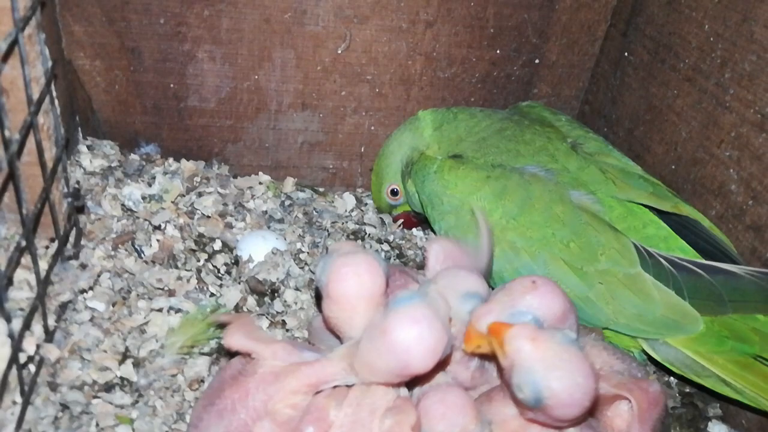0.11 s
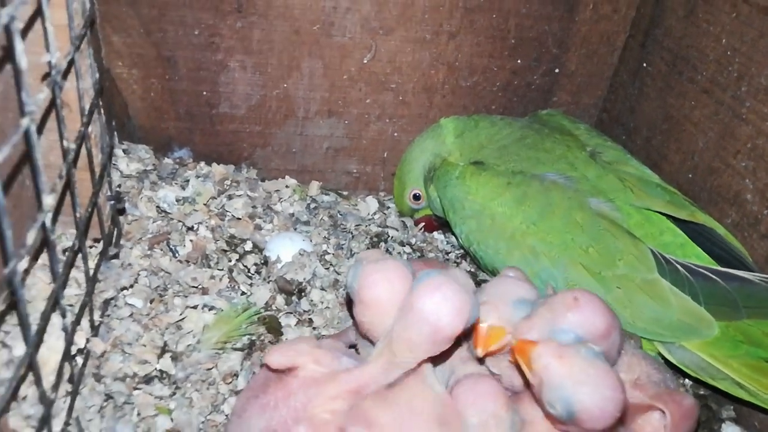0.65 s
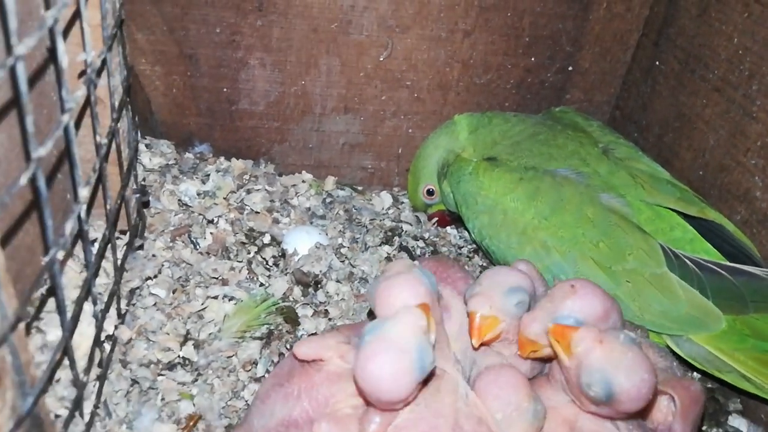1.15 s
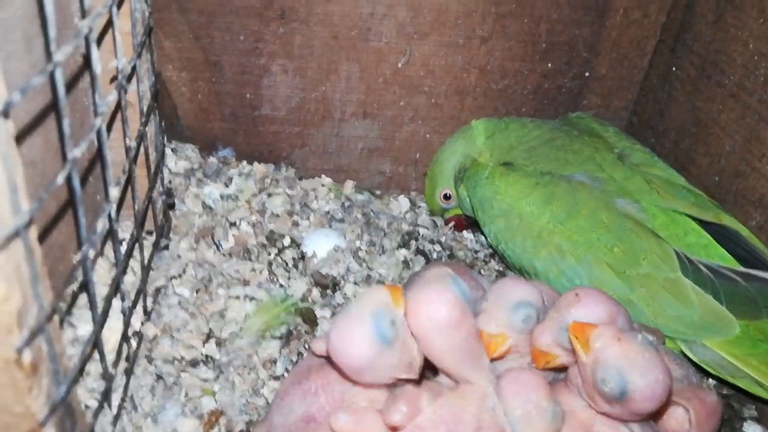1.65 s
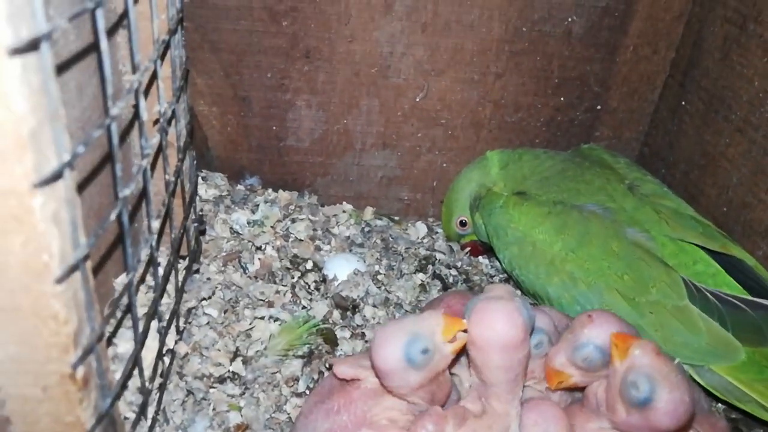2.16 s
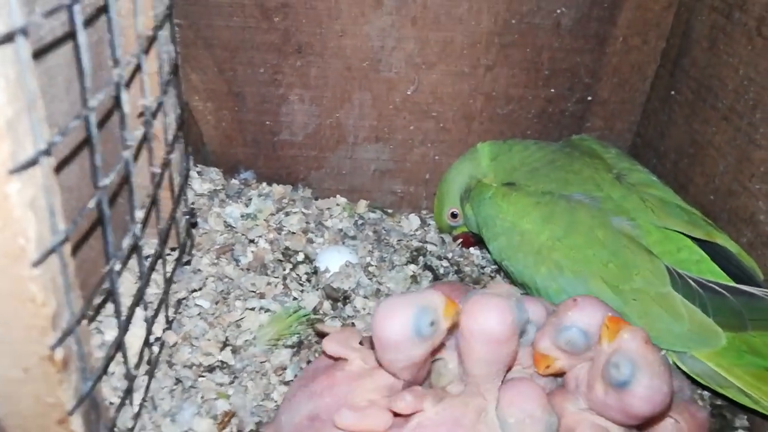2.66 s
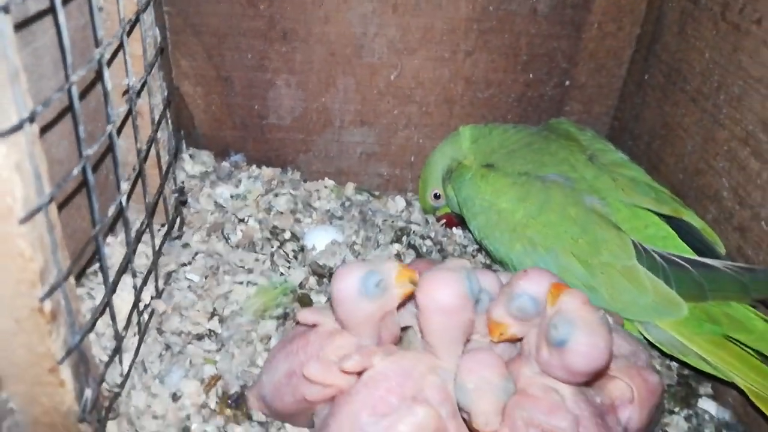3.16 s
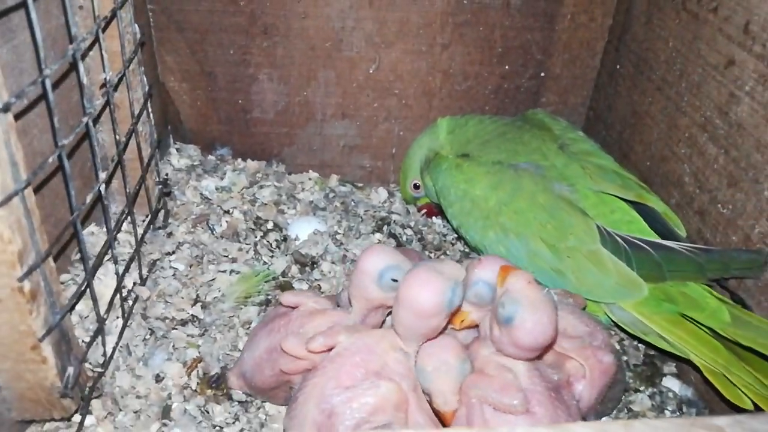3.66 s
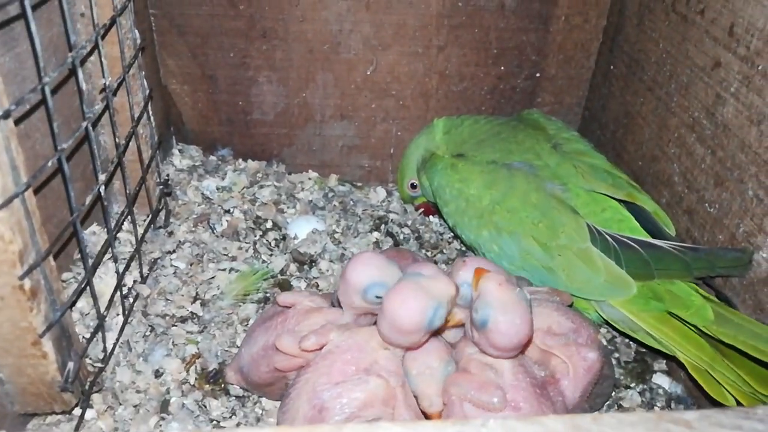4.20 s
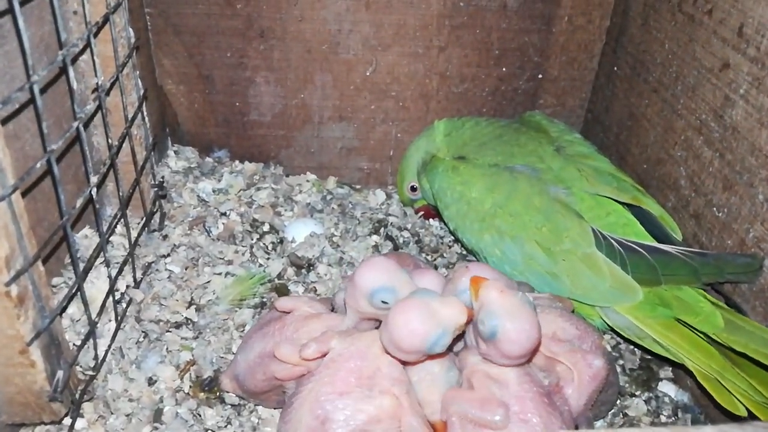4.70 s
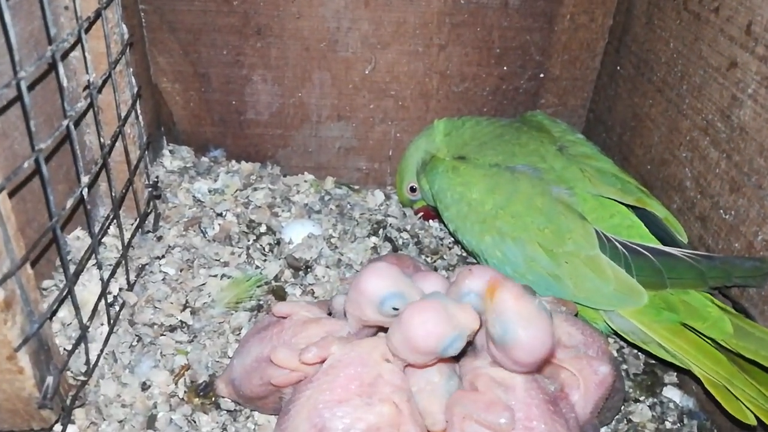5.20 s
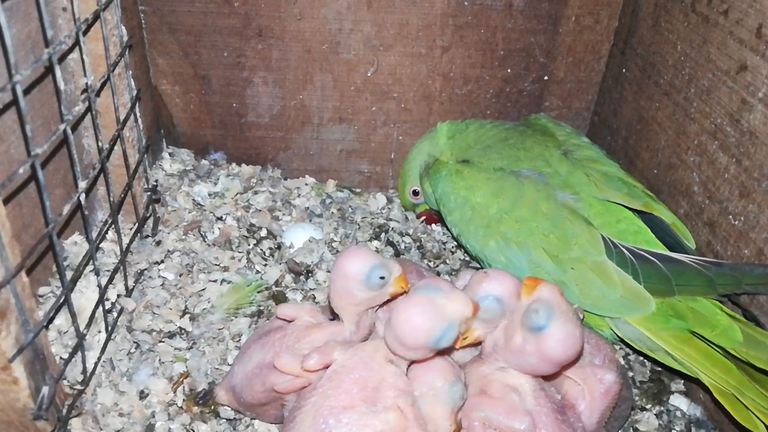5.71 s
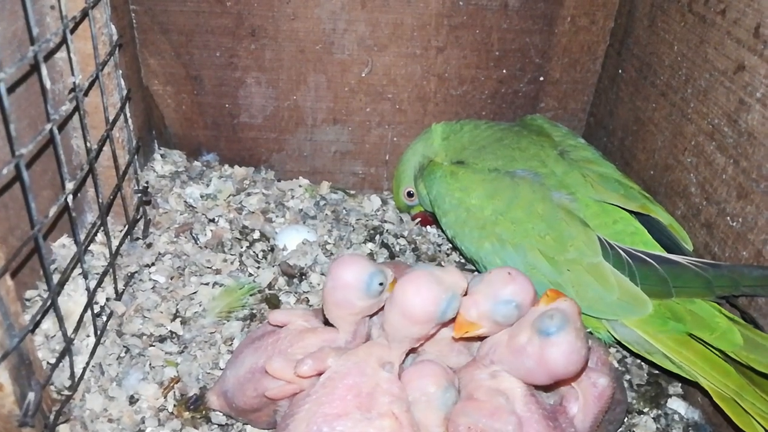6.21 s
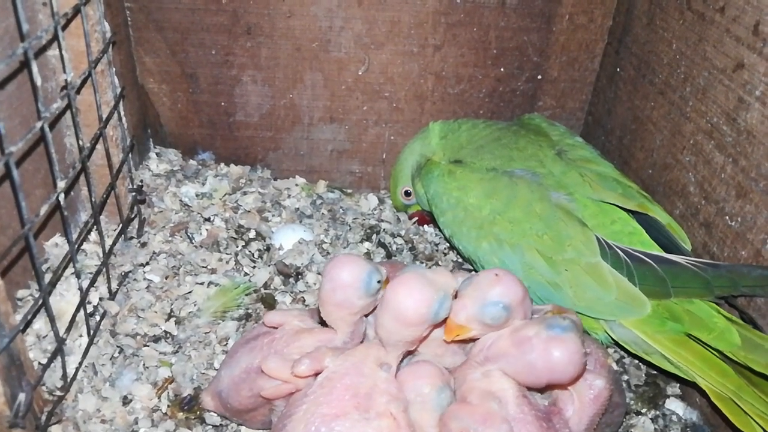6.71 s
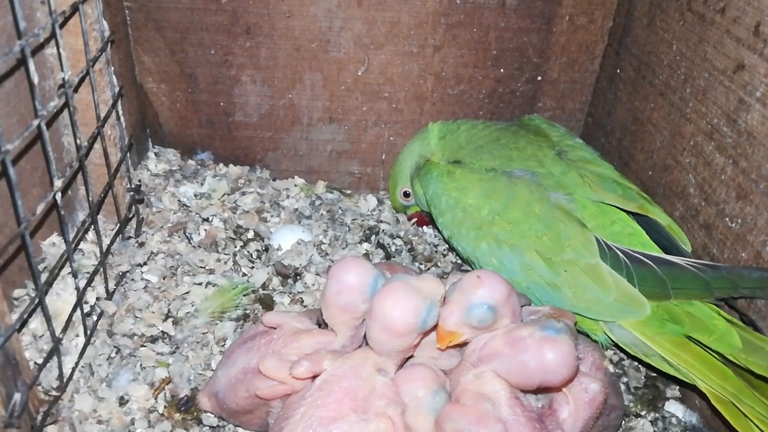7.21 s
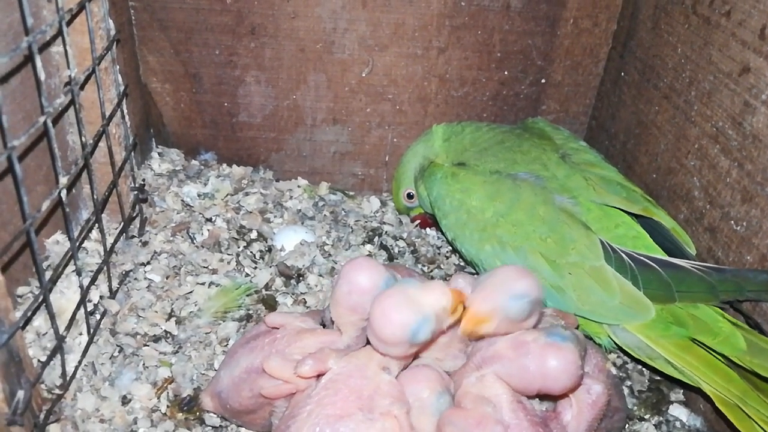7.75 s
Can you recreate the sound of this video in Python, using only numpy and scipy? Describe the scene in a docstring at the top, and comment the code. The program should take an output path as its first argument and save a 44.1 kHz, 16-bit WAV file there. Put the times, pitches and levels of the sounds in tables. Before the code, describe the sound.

Hungry parakeet nestlings trade rising whistles, raspy falling squawks and quick hoarse cries inside a hard, echoing wooden nest box.

```python
"""Begging nestling parakeets

Nestlings call in turns: one gives a rising whistle that breaks into a long falling squawk, another a quick
falling cry, at times after a short squeak or with a rasp; one clear arching call is close by. The voices are
stacks of harmonics on gliding pitches, in a hard-walled room of echoes and fading noise. Faint hoots (wavering
tones), a hum and a handling rumble (filtered noise) show in pauses, when the recorder's gain control lets go."""
import sys
import numpy as np
from scipy import signal
from scipy.fft import rfft, irfft, next_fast_len
from scipy.io import wavfile
from scipy.ndimage import uniform_filter1d

SR = 44100
rng = np.random.default_rng(int(sys.argv[2]) if len(sys.argv) > 2 else 0)


def invert_db(x):
    """Field ratio 10**(x/20) for x, a level in decibels (scalar or array-like)."""
    u = np.asarray(x, float) / 20
    return 10 ** u


def output_pcm(signal):
    """Save a mono or channel-first signal as 16-bit PCM at the path in sys.argv[1].

    Samples are clipped to [-1, 1] before scaling.
    """
    pcm = np.clip(np.atleast_2d(signal).T, -1, 1) * 32767
    wavfile.write(sys.argv[1], SR, np.round(pcm).astype(np.int16))


N = 346626

# first nestling's throat, a fixed filter on its harmonics: (frequency [Hz], level [dB])
THROAT = [(1000, -7), (1600, -13), (2300, 2.5), (2700, 4), (3200, 2.5), (3700, -1), (4200, -3.5),
          (4800, -2), (5600, 0.5), (6700, -2), (8300, -7.5), (9200, -17.5), (11000, -11.5), (15000, -14)]
# second nestling's throat: (frequency [Hz], level [dB])
SMALL_THROAT = [(1500, -9.5), (2200, -1), (3000, 4), (4000, 0.5), (4600, 2.5), (5300, -1), (6000, -2),
                (7200, -15), (8800, -2.5), (10500, -10.5), (15000, -20.5)]
# glide of a squeak, before each note's factors: (time [s], pitch [Hz], effort [dB])
SQUEAK_SHAPE = [(0, 3269, -18), (.01, 3262, -0.5), (0.033, 3380, 1.5), (0.048, 3472, -40.5)]
# falling squawks: (time [s], level [dB], pitch factor, length factor)
SQUAWKS = [(.922, -18, 1.052, 0.94), (1.351, -18.5, 1.032, .97), (2.567, -18, 1.03, 0.89),
           (3.001, -18, 1.016, 0.9), (4.341, -17, 1.05, 0.89), (4.776, -20.5, 1.001, .9),
           (5.795, -18, 1.024, .82), (6.277, -18, 0.98, 0.8)]


def evened(x):
    """Scales a sound to an rms of one."""
    return x / np.sqrt(np.mean(x ** 2) + 1e-20)


def read(points, hz):
    """Reads a curve over frequency, straight between its points on a log axis."""
    f, value = np.transpose(points)
    return np.interp(np.log(hz + 1), np.log(f + 1), value)


def add(mix, s, sound):
    """Lays a sound into the mix at s seconds."""
    part = mix[round(s * SR):][:len(sound)]
    part += sound[:len(part)]


def colour(x, points, share=1):
    """Filters along time by a spectrum in dB, of which only a share may be applied."""
    length = x.shape[-1]
    size = next_fast_len(length)
    gain = invert_db(share * read(points, np.fft.rfftfreq(size, 1 / SR)))
    return irfft(rfft(x, size) * gain, size)[..., :length]


def swelling(rest_db, waver_db, swells):
    """A level that wavers by chance around its rest, with smooth swells added."""
    waver = signal.oaconvolve(rng.standard_normal(N), np.hanning(round(0.09 * SR)), "same")
    level = invert_db(rest_db + waver_db * evened(waver))
    for s, db, length in swells:
        add(level, max(s - length / 2, 0), invert_db(db) * np.hanning(round(length * SR)))
    return level


def fading(noise, seconds):
    """Stereo noise whose bands die away at the speeds of the room."""
    # reverberation time of the room: (frequency [Hz], time to fall 60 dB [s])
    ring = [(300, 0.23), (1000, 1), (2600, 0.81), (5000, 0.61), (8000, 0.6), (14000, 0.16)]
    hz, t, bins = signal.stft(noise, SR, nperseg=256)
    decay = invert_db(-60 * t / read(ring, hz)[:, None])
    tail = signal.istft(bins * decay, SR, nperseg=256)[1]
    return tail[:, :round(seconds * SR)]


def room(x, wet_db, echo_db=0):
    """Direct sound a little later on the right, near-wall echoes and a dense tail for each side."""
    # near-wall echoes, before echo_db and the right side's longer path: (delay [s], level [dB])
    echoes = [(.0013, -5.5), (.0031, -5), (.0058, -11), (.009, -0.5), (0.0136, -8.5), (.019, 0)]
    right_lag = 25  # samples
    response = fading(rng.standard_normal((2, int(1.3 * SR))), 1.3)
    response *= 1 - np.exp(-np.arange(response.shape[1]) / (0.0019 * SR))  # the tail builds up
    response *= invert_db(wet_db) / np.linalg.norm(response[0])
    response[[0, 1], [0, right_lag]] += 1  # direct sound
    for s, db in echoes:
        response[0, round(s * SR)] += invert_db(db + echo_db)
        response[1, round(s * SR * 1.17) + right_lag] -= invert_db(db + echo_db)
    return signal.oaconvolve(x[None], response, axes=1)[:, :N]


def room_air():
    """Steady coloured noise, unlike on both sides."""
    # colour of the room air: (frequency [Hz], relative density [dB per Hz])
    air_colour = [(590, -49), (1000, -23), (1070, 4), (1360, -7), (1650, -4), (1750, -1.5), (2800, -11),
                  (10000, -31.5), (13000, -56), (22000, -120)]
    return invert_db(-59.5) * evened(colour(rng.standard_normal((2, N)), air_colour))


def stir():
    """A low stir in the room: swelling noise, unlike on both sides."""
    # swells of the stir: (middle [s], peak level [dB], length [s])
    swells = [(.25, -56, 0.59), (1.579, -51.5, 0.79), (2.58, -55, 1), (3.85, -51, 0.7), (4.36, -54.5, 0.37),
              (4.83, -47.5, 0.41), (5.349, -47, 0.92), (6.67, -56.5, .12), (6.96, -49, 0.4),
              (7.23, -51.5, .15), (7.5, -58, .12), (7.75, -48.5, 0.25)]
    # colour of the stir: (frequency [Hz], relative density [dB per Hz])
    stir_colour = [(200, -12), (320, -9), (400, 0.5), (560, -5.5), (800, 0.5), (1000, -3.5), (1300, -35.5)]
    noise = evened(colour(rng.standard_normal((2, N)), stir_colour))
    return swelling(rest_db=-67, waver_db=3.9, swells=swells) * noise


def drone():
    """A hollow low hum: a narrow band of noise that swells, alike on both sides."""
    # swells of the drone: (middle [s], peak level [dB], length [s])
    swells = [(.52, -45, 0.23), (0.799, -70, 0.34), (1.15, -59, 0.11), (1.45, -40.5, 0.18),
              (1.66, -42, 0.47), (1.98, -54, 0.13), (2.14, -53, .1), (3.62, -55.5, .4), (3.98, -61, 0.22),
              (4.28, -59, 0.18), (5.4, -56.5, 0.88), (7.09, -57, 0.33)]
    centre_hz, half_width_hz = 215.3, 18
    edges_hz = [centre_hz - half_width_hz, centre_hz + half_width_hz]
    band = signal.butter(2, edges_hz, "band", fs=SR, output="sos")
    hum = evened(signal.sosfilt(band, rng.standard_normal(N)))
    return swelling(rest_db=-68.5, waver_db=5.3, swells=swells) * hum


def handling_rumble():
    """Bass-heavy noise that swells, alike on both sides."""
    # swells of the rumble: (middle [s], peak level [dB], length [s])
    swells = [(0.568, -65, 0.22), (1.35, -53, 0.22), (1.66, -52.5, 0.42), (1.93, -52.5, 0.37),
              (2.129, -60, 0.31), (2.9, -64, 0.24), (3.74, -45.5, 0.19), (3.87, -48, 0.39),
              (4.08, -53, 0.54), (4.36, -54, 0.33), (4.58, -60, 0.2), (5.07, -54, 0.3)]
    # colour of the rumble: (frequency [Hz], relative density [dB per Hz])
    rumble_colour = [(20, -18), (35, -24.5), (48, 4), (70, -10), (100, 0.5), (150, -10), (300, -19),
                     (620, -43), (800, -30), (1300, -30), (3000, -33), (6000, -57.5), (10000, -95)]
    noise = evened(colour(rng.standard_normal(N), rumble_colour))
    return swelling(rest_db=-67.5, waver_db=2.3, swells=swells) * noise


def earlier_cry():
    """The tail of a loud cry just over: coloured noise that rings out in the first second."""
    # colour of the cry's tail: (frequency [Hz], relative density [dB per Hz])
    tail_colour = [(150, -43), (250, -38), (339, -72), (414, 0.5), (525, -15), (675, 3), (978, -16),
                   (1180, -2), (2050, -1.5), (2270, -11), (2470, 2.5), (3700, -10), (3960, -14.5),
                   (5830, -19.5), (14000, -76)]
    out = np.zeros((2, N))
    noise = evened(colour(rng.standard_normal((2, SR)), tail_colour))
    out[:, :SR] = invert_db(-29) * fading(noise, 1)
    return out


def background():
    """The sum of the room's noises and the ringing left at the start."""
    return room_air() + stir() + drone() + handling_rumble() + earlier_cry()


def rustles():
    """Brief soft swells of fine noise, unlike on both sides."""
    # rustles in the pauses: (time [s], level [dB], length [s])
    rows = [(0.532, -68, 0.14), (3.614, -58.5, 0.15), (3.747, -55.5, 0.16), (3.92, -63.5, .16)]
    # colour of the rustles: (frequency [Hz], relative level [dB])
    rustle_colour = [(1000, -7), (2000, -4), (5000, -1), (8000, -9), (10500, -19), (12000, -37)]
    out = np.zeros((N, 2))
    for s, db, length in rows:
        noise = rng.standard_normal((2, SR // 4))
        swell = evened(colour(noise, rustle_colour))[:, :round(length * SR)]
        add(out, s, (invert_db(db) * swell * np.hanning(swell.shape[1])).T)
    return out.T


def hoots():
    """Soft, wavering tones with two overtones."""
    # faint low hoots far off: (time [s], length [s], pitch [Hz], level [dB], overtone level [dB])
    rows = [(0.218, 0.042, 394.3, -52, -7), (1.321, 0.037, 592, -52, -31), (2.439, 0.046, 757, -43, -3),
            (2.632, 0.095, 392.5, -53.5, -0.5), (3.133, 0.24, 847, -63, -36),
            (4.234, 0.11, 402, -50.5, -10.5), (4.673, 0.051, 660, -47, -4), (4.775, 0.065, 424, -57, -16),
            (5.437, 0.17, 396, -57, 4), (6.853, 0.095, 627, -53.5, 0.5), (7.682, 0.19, 408, -51, -4.5)]
    out = np.zeros(N)
    for s, length, hz, db, over_db in rows:
        t = np.arange(0, length, 1 / SR)
        waver = evened(uniform_filter1d(rng.standard_normal(len(t)), size=500))
        phase = 2 * np.pi * hz * np.cumsum(1 + 0.052 * waver) / SR
        tone = np.sin(phase) + invert_db(over_db) * (np.sin(2 * phase) + np.sin(3 * phase))
        add(out, s, invert_db(db) * tone * signal.windows.tukey(len(t), .5))
    return out


def rasps():
    """Air noise let through in uneven bursts, some two hundred a second."""
    # hoarse rasps around some cries: (time [s], level [dB], length [s])
    rows = [(1.686, -31, 0.058), (1.93, -26, 0.028), (2.182, -32, 0.18), (5.383, -30, 0.115),
            (6.088, -26.5, 0.051), (6.388, -25.5, 0.032), (6.656, -32, 0.099), (6.937, -31.5, 0.054),
            (7.199, -37, 0.11), (7.477, -34, 0.11)]
    # colour of the rasps: (frequency [Hz], relative level [dB])
    rasp_colour = [(400, -49), (700, -29), (1050, -4.5), (1600, -9), (2500, 8.5), (2900, 2.5), (3350, 4.5),
                   (4000, 5), (4800, 1.5), (5700, -10), (6800, -12), (8500, -18.5), (11000, -38),
                   (16000, -48)]
    out = np.zeros(N)
    for s, db, length in rows:
        air, uneven = rng.standard_normal((2, SR // 4))
        rate_hz = 190 * (1 + 0.31 * evened(uniform_filter1d(uneven, size=300)))
        turns = np.cumsum(rate_hz) / SR
        pulses = 0.3 + np.exp(-(turns % 1) / 0.22)  # each burst opens at once, then dies down
        burst = evened(colour(air * pulses, rasp_colour))[:round(length * SR)]
        t = np.arange(len(burst)) / SR
        fade = (1 - np.exp(-t / 0.0055)) * np.cos(np.pi / 2 * t / length)
        add(out, s, invert_db(db) * burst * fade)
    return out


def notes(rows, shape, tone, throat, rough, swing=1, lean_db=0):
    """Harmonics of the syrinx follow a pitch shape; roughness shakes the pitch from cycle to cycle.

    swing stretches the glide below its top pitch; lean_db is how far the start outweighs the end."""
    out = np.zeros(N)
    at, shape_hz, effort_db = np.transpose(shape)
    each = np.ones(len(rows))
    for (s, db, pitch, length, *_), harsh, lean in zip(rows, rough * each, lean_db * each):
        t = np.arange(0, at[-1], 1 / (SR * length))[:SR // 3]  # time within the shape
        shake = evened(uniform_filter1d(rng.standard_normal(SR // 3), size=30))[:len(t)]
        hz = pitch * uniform_filter1d(np.interp(t, at, shape_hz), size=200, mode="nearest")
        hz *= (hz / hz.max()) ** (swing - 1)
        phase = 2 * np.pi * np.cumsum(hz * (1 + 0.1857 * harsh * shake)) / SR
        stack = np.zeros(len(t))
        for k, harmonic_db in enumerate(tone, 1):
            audible = k * hz < .4 * SR  # stays clear of aliasing
            stack += invert_db(harmonic_db + read(throat, k * hz)) * np.sin(k * phase) * audible
        level_db = db + np.interp(t, at, effort_db) + lean * (.5 - t / at[-1])
        add(out, s, invert_db(level_db) * stack)
    return out


def squeaks():
    """The second nestling's short high notes, most of them just ahead of a cry."""
    # squeaks: (time [s], level [dB], pitch factor, length factor, roughness [0-1])
    rows = [(1.702, -21, 1.182, 1.73, 0.17), (1.737, -32, 1.7, 1.3, 0), (1.947, -26, .79, 0.65, 0.03),
            (2.2, -25, 1.05, 1.3, 0.21), (2.224, -31, 1.37, 1, 0.14), (4.551, -25.5, 1.01, .9, 0.09),
            (6.115, -29, 1.01, 0.94, 0.2), (6.39, -33, 1.27, 1, 0), (6.68, -28, 1.001, 0.68, 0.34),
            (6.945, -35.5, 0.83, .76, 0.54), (7.215, -34, 0.81, 0.58, 0.2), (7.49, -29, 1.03, 0.96, 0.2)]
    # harmonics, first to last: level [dB]
    tone = [2.5, -5, -14.5, -30.5]
    return notes(rows, SQUEAK_SHAPE, tone, SMALL_THROAT, rough=np.transpose(rows)[-1], swing=1.4)


def arching_call():
    """One clear call whose pitch rises, holds and falls, with hardly any roughness."""
    # call: (time [s], level [dB], pitch factor, length factor)
    rows = [(5.144, -10, 1., 1.)]
    # glide, before the call's factors: (time [s], pitch [Hz], effort [dB])
    shape = [(0, 1700, -40), (.012, 1900, -8), (.027, 2420, -2), (.055, 2540, 0), (.08, 2530, 0),
             (.097, 2330, 0), (.124, 1680, -5), (.136, 1500, -40)]
    # harmonics, first to last: level [dB]
    tone = [0, 4, -4, -6.5, -10, -9]
    return notes(rows, shape, tone, SMALL_THROAT, rough=.01)


def cries():
    """The second nestling's quick falling notes, all a little hoarse and some far rougher."""
    # cries: (time [s], level [dB], pitch factor, length factor, added roughness [0-1])
    rows = [(1.77, -18.5, 0.93, 0.55, .51), (1.96, -19, 0.94, 1.07, .54), (2.234, -19.5, 0.96, .9, .65),
            (4.592, -16, .95, 0.75, 0.03), (4.808, -16.5, 1.02, 0.84, .09),
            (5.053, -15.5, 0.98, 1.05, 0.16), (5.335, -14.5, 0.99, 0.72, 0.29),
            (5.42, -22, 0.87, 1.07, 0.43), (5.582, -15.5, 0.98, 0.91, 0.07), (5.845, -16, 0.99, .76, 0.07),
            (6.127, -16.5, 1.001, .88, .11), (6.415, -17, 0.98, .85, 0.08), (6.696, -16, 0.98, .82, 0.03),
            (6.969, -16.5, 0.98, .87, 0.12), (7.234, -17.5, 0.98, 0.96, 0.07),
            (7.52, -17.5, .95, 0.73, 0.03)]
    # glide, before each cry's factors: (time [s], pitch [Hz], effort [dB])
    shape = [(0, 2557, -15), (.015, 2466, -3.5), (.035, 2330, -4.5), (.06, 2176, -2.5), (.09, 1987, -2),
             (.115, 1701, -9.5), (0.136, 1470, -13.5)]
    # harmonics, first to last: level [dB]
    tone = [-9, -2, -12, -17.5, -22, -22.5]
    rough = 0.04 + np.transpose(rows)[-1]
    return notes(rows, shape, tone, SMALL_THROAT, rough, swing=0.95)


def rising_whistles():
    """The first nestling's upward glides, dominated by the fundamental."""
    # whistles: (time [s], level [dB], pitch factor, length factor, start over end [dB])
    rows = [(.864, -17, 1, 1.01, -11), (1.294, -19.5, 1.027, 0.88, 15), (2.499, -15.5, 1, 0.97, -3),
            (2.945, -18, 1.02, 1.09, 5.5), (4.282, -17, 1, 1.11, -2.5), (4.707, -20.5, 1.01, 1.05, 6.5),
            (5.73, -19.5, 1.03, 1.18, 5.5), (6.203, -14.5, .98, .7, -6)]
    # glide, before each whistle's factors: (time [s], pitch [Hz], effort [dB])
    shape = [(0, 2359, -30), (.007, 2475, 0), (0.021, 2520, 1), (0.033, 2686, 0), (0.048, 2796, 1),
             (.066, 2873, -22), (0.076, 2820, -41)]
    # harmonics, first to last: level [dB]
    tone = [2, -11, -18.5, -27, -43]
    return notes(rows, shape, tone, THROAT, rough=0.042, swing=.9, lean_db=np.transpose(rows)[-1])


def held_notes():
    """A thin, almost level note closes each squawk, and the cry just over at the start."""
    # harmonics, first to last: level [dB]
    tone = [-12.5, -11.5, -0.5, -28, -30, -20.5]
    pitch, length = .345, 1.31  # factors on the squeak's shape
    rows = [(s + .15 * stretch, -24.5, pitch, length) for s, _, _, stretch in SQUAWKS]
    rows.append((0, -49, pitch, length))  # of the cry just over
    return notes(rows, SQUEAK_SHAPE, tone, THROAT, rough=0.043, swing=.2)


def squawks():
    """The first nestling's long falling notes, rich in harmonics and rough."""
    # glide, before each squawk's factors: (time [s], pitch [Hz], effort [dB])
    shape = [(0, 2247, -43), (.008, 2093, 1.5), (.022, 1800, 2.5), (.04, 1665, -1.5), (.075, 1575, 2.5),
             (.1, 1477, 0), (.135, 1270, -2.5), (.16, 1206, -9), (0.189, 1148, -3), (0.207, 1230, -24)]
    # harmonics, first to last: level [dB]
    tone = [-4, -3.5, -11.5, -12.5, -16.5, -35, -28, -24, -68, -26.5]
    return notes(SQUAWKS, shape, tone, THROAT, rough=0.0949)


def scene():
    """Sets the nestlings and hoots in the room, over the background and rustles."""
    far = squeaks() + cries() + rasps() + rising_whistles() + held_notes() + squawks()
    near = room(arching_call(), wet_db=-5, echo_db=-12)
    return background() + rustles() + room(hoots(), wet_db=6.5) + near + room(far, wet_db=7.0)


def top_cut(x):
    """Nothing passes above the cut-off."""
    return signal.sosfilt(signal.butter(12, 15700, fs=SR, output="sos"), x)


def record(dry):
    """The two microphones differ in the treble; gain control ducks everything under loud calls."""
    # colour between the sides, applied in part to each: (frequency [Hz], tilt to the left [dB])
    tilt = [(200, 0), (450, -2), (1300, -1), (2400, 1), (4400, 6), (8000, 8), (15000, -2)]
    ports = np.array([colour(dry[0], tilt, 0.9), colour(dry[1], tilt, -0.26)])
    power = uniform_filter1d((ports ** 2).mean(0), size=600)
    power_db = 10 * np.log10(abs(power) + 1e-12)
    fall_db = np.arange(N) * 34.0 / SR  # the held peak level sinks by 34 dB a second
    held_db = np.maximum.accumulate(power_db + fall_db) - fall_db
    over_db = np.maximum(held_db + 35.5, 0)  # above a threshold of -35.5 dB
    gain_db = 5.0 - 0.41 * uniform_filter1d(over_db, size=300)
    mix = np.clip(ports * invert_db(gain_db), -1, 1)
    return top_cut(mix)


dry = scene()
out = record(dry)
output_pcm(out)
```